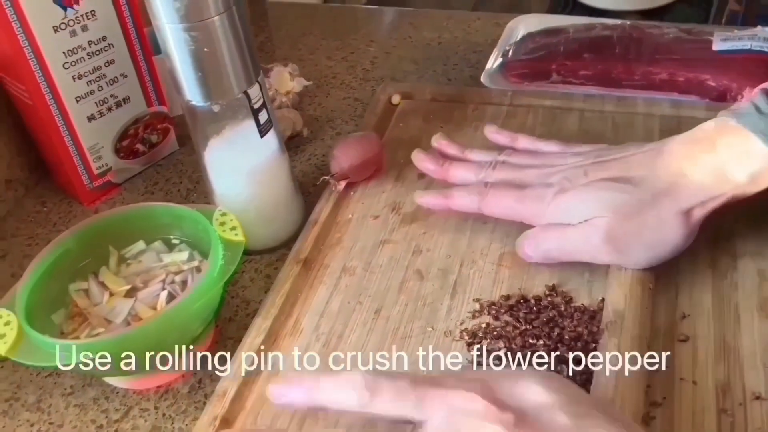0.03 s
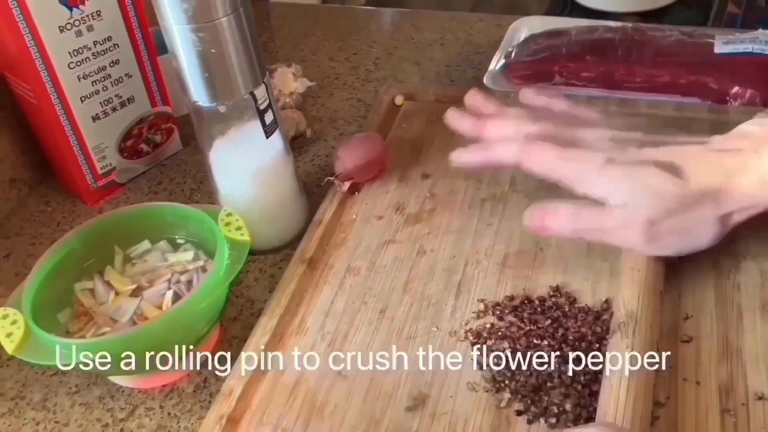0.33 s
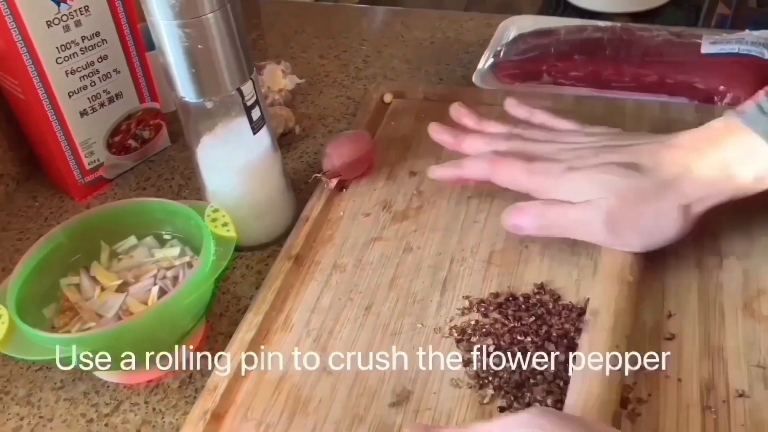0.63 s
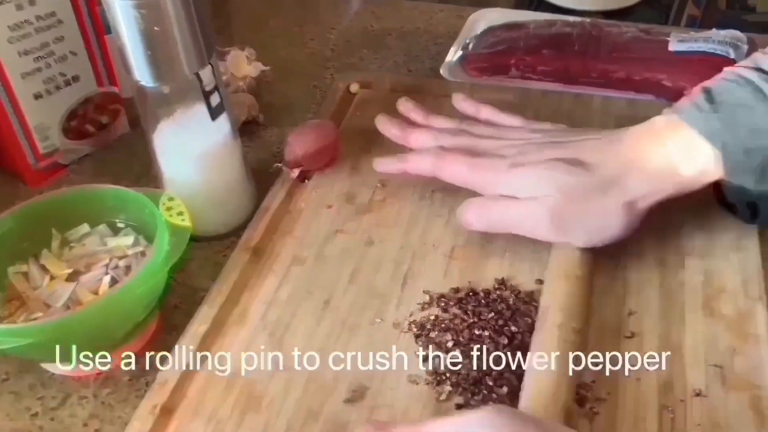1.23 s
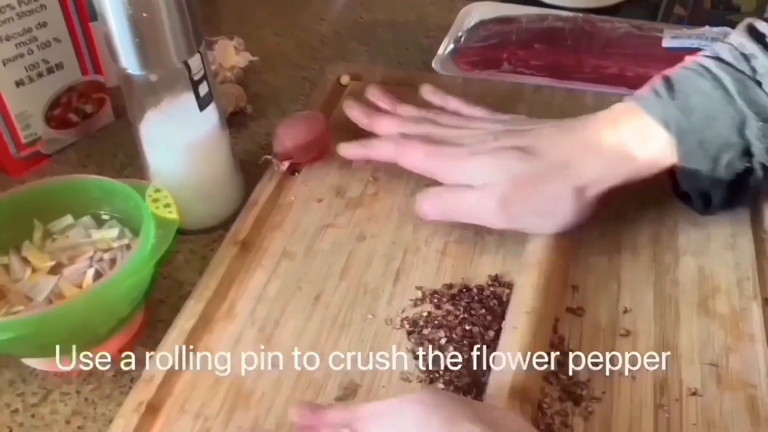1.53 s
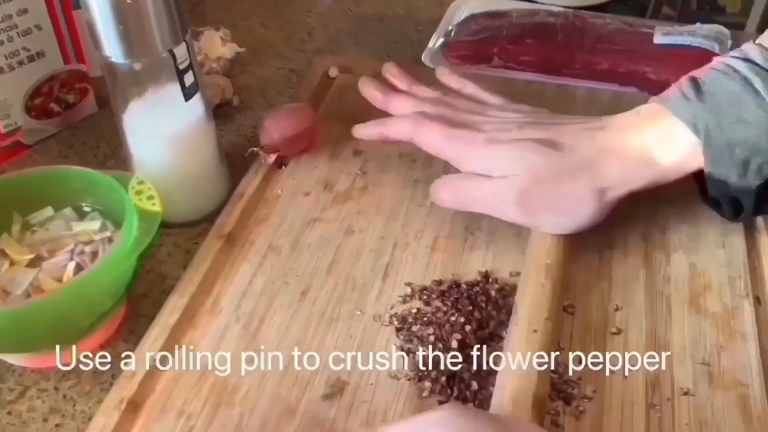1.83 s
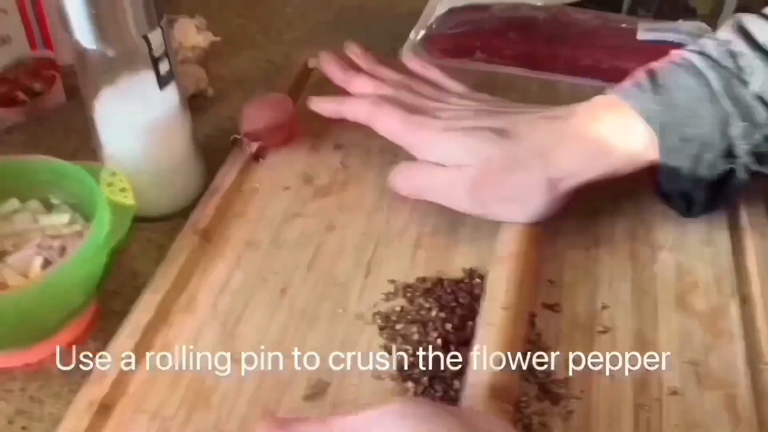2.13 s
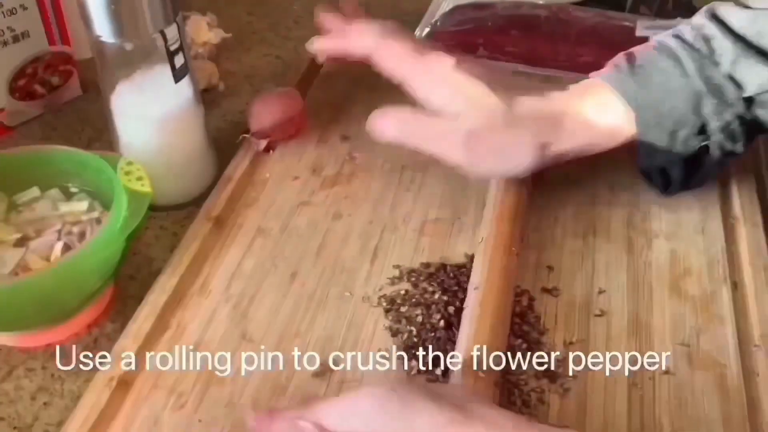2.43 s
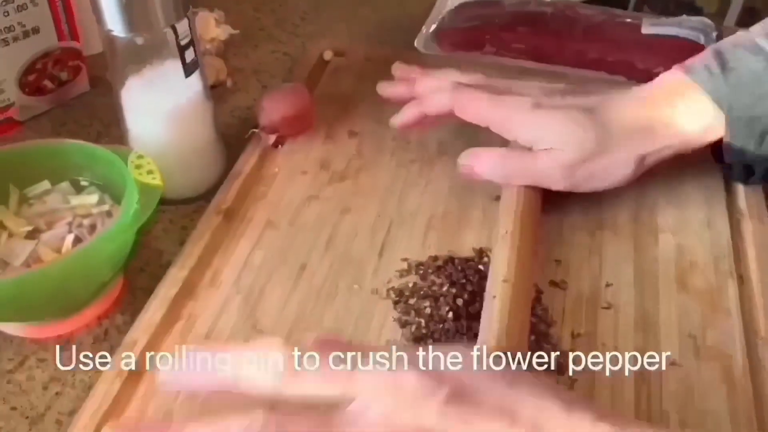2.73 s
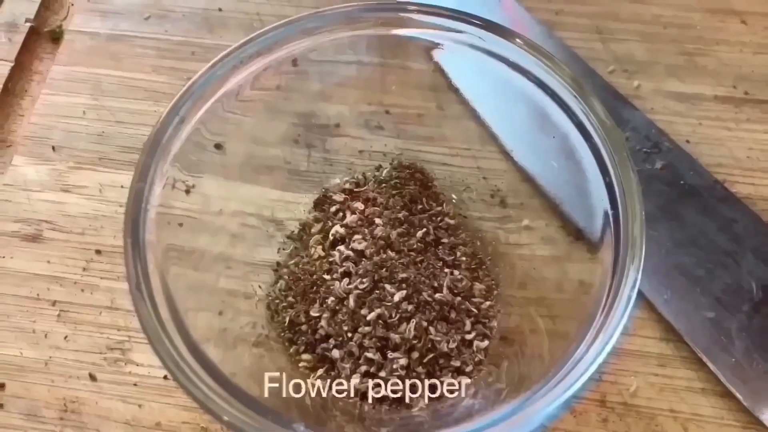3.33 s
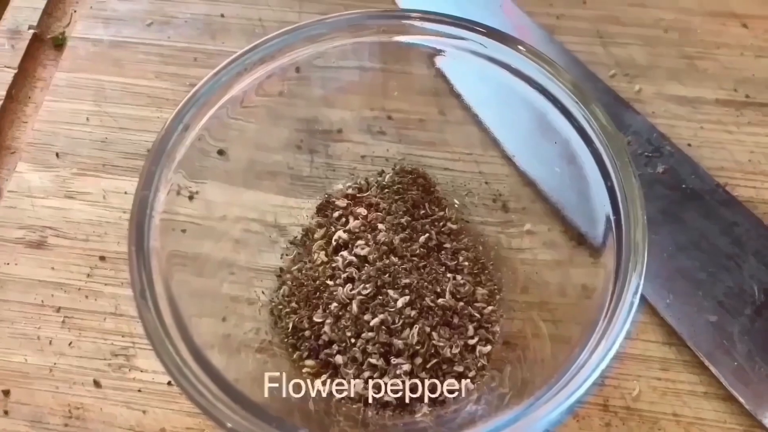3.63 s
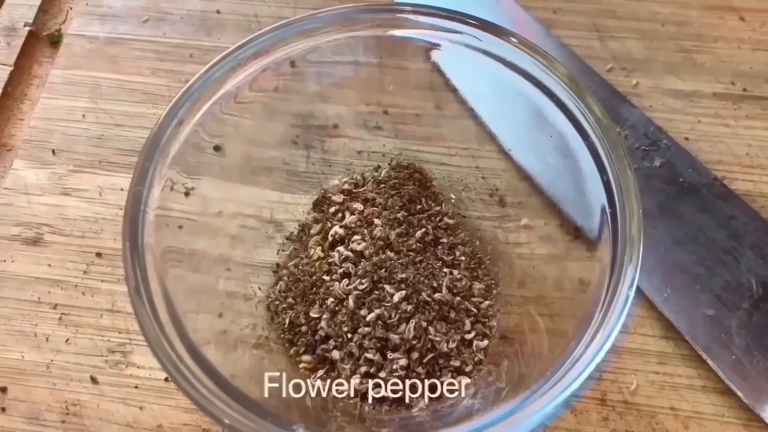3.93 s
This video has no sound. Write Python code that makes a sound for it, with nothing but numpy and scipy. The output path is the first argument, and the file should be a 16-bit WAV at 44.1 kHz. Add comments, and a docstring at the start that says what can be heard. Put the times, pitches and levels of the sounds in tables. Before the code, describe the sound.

Peppercorns crackle in short, crisp bursts under a rolling pin, with soft thuds from the wooden board. After a knock, the crushing cuts off, leaving a low hum and slight rustling in a quiet kitchen.

```python
"""A quiet kitchen: a wooden rolling pin is pressed slowly over dry peppercorns on a wooden board.
Husks snap one by one, each a click ringing shell and wood, and crumble in short crunches of tiny
fractures. The board rings, rumbles, thuds and knocks under the pin. The level dips briefly near 2 s;
at 2.3 s the sound breaks off and returns with only the kitchen's air and hum and a few faint rustles."""
import sys
import numpy as np
from scipy import signal
from scipy.fft import rfft, irfft
from scipy.io import wavfile
from scipy.ndimage import uniform_filter1d

SR = 44100
rng = np.random.default_rng(int(sys.argv[2]) if len(sys.argv) > 2 else 0)


def to_wav(sig):
    """Store sig (one row per channel, or 1-D mono) as 16-bit WAV at the path in sys.argv[1].

    Samples outside -1..1 are clipped; the rate is SR.
    """
    pcm = np.clip(np.atleast_2d(sig), -1, 1) * 32767
    pcm = np.round(pcm).astype(np.int16)
    wavfile.write(sys.argv[1], SR, pcm.T)  # frames by channels


N = 176400
T = np.arange(N) / SR

# Damped resonances of pin and board. Each row: pitch in Hz, width in Hz, gain in dB, pan (L-R) in dB.
WOOD_MODES = [(435, 220, -15, -2), (1230, 240, -5, 4), (1650, 580, 0, 8), (2480, 250, 1, 7.5),
              (3870, 770, -4.5, -4.5)]
# Brief dips in level. Each row: start in seconds, end in seconds, gain in dB.
DIPS = [(1.986, 2.004, -22), (2.311, 2.327, -22), (2.333, 2.376, -45)]


def from_db(db):
    """Decibels to gain."""
    return np.exp(np.asarray(db) * (np.log(10) / 20))


def unit_rms(x):
    """Scale to rms 1."""
    return x / np.sqrt(np.mean(x ** 2) + 1e-20)


def pan(db):
    """Stereo gains for a left minus right level."""
    return from_db([[db / 2], [-db / 2]])


def curve(rows):
    """Join (seconds, value) rows by straight lines."""
    return np.interp(T, *np.transpose(rows))


def at_hz(rows, hz):
    """Read (Hz, value) rows on a log-frequency axis."""
    row_hz, value = np.transpose(rows)
    return np.interp(np.log(hz + 1e-3), np.log(row_hz), value)


def drift(rate_hz):
    """Slow random wander of rms 1."""
    r = np.exp(-80 * np.pi * rate_hz / SR)
    slow = signal.lfilter([1], [1, -2 * r, r * r], rng.standard_normal(N // 40 + 2002))[2000:]
    return np.interp(np.arange(N) / 40, np.arange(len(slow)), unit_rms(slow))


def butterworth(x, order, hz, kind):
    """Low, high or band pass."""
    return signal.sosfilt(signal.butter(order, hz, kind, fs=SR, output="sos"), x)


def resonate(x, hz, width_hz):
    """Two-pole resonance, peak gain 1."""
    r = np.exp(-np.pi * width_hz / SR)
    feedback = [1, -2 * r * np.cos(2 * np.pi * hz / SR), r * r]
    return signal.lfilter(np.array([1, 0, -1]) * (1 - r * r) / 2, feedback, x + 1e-18 * T[:x.shape[-1]])


def noise(colour):
    """Stereo noise of rms 1 from (Hz, dB) rows, alike in both ears in the bass."""
    # Each row: frequency in Hz, left-right correlation.
    likeness = [(60, .95), (150, .91), (300, .8), (600, .45), (2000, .25)]
    hz = np.arange(N // 2 + 1) * SR / N
    mid, side = rfft(rng.standard_normal((2, N)))
    alike = at_hz(likeness, hz)
    spectrum = np.sqrt(1 + alike) * mid + np.sqrt(1 - alike) * side * [[1], [-1]]
    return unit_rms(irfft(from_db(at_hz(colour, hz)) * spectrum, N))


def ring(force, modes):
    """Long-ringing modes driven by a force."""
    return sum(from_db(db) * resonate(force, hz, np.log(1000) / np.pi / t60_s) for hz, db, t60_s in modes)


def band_bank(clicks, bands, pitch_ratio, spread_db=2.7, redraw_hz=45):
    """Parallel panned bands, each driven with a randomly stepping strength."""
    hold, n = SR // redraw_hz, clicks.shape[-1]
    strengths = from_db(spread_db * rng.uniform(-1, 1, (len(bands), n // hold + 1)))
    out = 0
    for strength, (hz, width_hz, db, pan_db) in zip(strengths, bands):
        drive = clicks * np.repeat(strength, hold)[:n]
        out = out + from_db(db) * pan(pan_db) * resonate(drive, hz * pitch_ratio, width_hz)
    return out


def reflections(x, t60_s):
    """Dense decaying echoes of unit energy, unrelated in the two ears."""
    t = T[:int(t60_s * SR) + 2]
    tail = rng.standard_normal((2, len(t))) * from_db(-60 * t / t60_s) * (1 - np.exp(-t * 40 / t60_s))
    tail /= np.sqrt(np.sum(tail ** 2, axis=1, keepdims=True))
    return signal.oaconvolve(x, tail, axes=1)[:, :x.shape[1]]


def worktop(x):
    """Add quick scatter off board and worktop."""
    return x + reflections(x, t60_s=.025)


def kitchen(x, wall_hz=5920, tail_db=-10.5):
    """Add the duller tail of the room."""
    return x + from_db(tail_db) * reflections(butterworth(x, 1, wall_hz, "low"), t60_s=.23)


def room_tone(air_db=-59, hum_gain_db=3, waver_db=1.2):
    """Moving air and the wavering hum of an appliance."""
    # Each row: frequency in Hz, level in dB.
    hum_partials = [(59, -71.5), (176.5, -65.5)]
    # Each row: frequency in Hz, relative level in dB.
    air_colour = [(20, -34), (35, -17), (55, 0.09), (90, -7), (140, -4), (250, -11), (380, -8), (480, -12),
                  (800, -18), (1050, -24), (1220, -21), (1450, -32), (2300, -32), (2900, -39), (4400, -39),
                  (5600, -47), (9000, -45), (16000, -56)]
    # Narrow resonances in the air noise. Each row: centre in Hz, width in Hz, rms in dB.
    air_bands = [(342, 75, -65), (1230, 70, -76.5), (2390, 90, -86)]
    out = 0
    for hz, db in hum_partials:
        rms = from_db(db + hum_gain_db + waver_db * drift(2.7))
        out = out + np.sqrt(2) * rms * np.sin(2 * np.pi * hz * T + .5 * drift(1.8))
    air = noise(air_colour)
    for hz, width_hz, db in air_bands:
        band = resonate(resonate(air, hz, width_hz), hz, 2 * width_hz)
        out = out + from_db(db) * unit_rms(band)
    return out + from_db(air_db) * noise(air_colour)


def rolling(rub_db=-58):
    """The pin rolls on the board: swelling rumble, steady rub of wood on wood."""
    # Each row: time in seconds, level in dB.
    rumble_levels = [(0.0, -81), (0.18, -50.5), (0.27, -76), (0.88, -57.5), (1.05, -53), (1.34, -82),
                     (1.45, -46), (1.52, -56), (2.0, -79), (2.08, -52), (2.3, -53.5)]
    # Each row: frequency in Hz, relative level in dB.
    rumble_colour = [(20, -24), (55, 0), (90, -2.5), (150, -13), (300, -13), (600, -29), (1500, -47),
                     (16000, -92.5)]
    rub_colour = [(20, -24), (120, -5), (300, 0.5), (600, -3.5), (1200, -6), (3000, -22), (16000, -60)]
    return from_db(curve(rumble_levels)) * noise(rumble_colour) + from_db(rub_db) * noise(rub_colour)


def crumbs(grains_per_s=2000, spread_db=3.3, clump_db=2, attack_s=.005, release_s=.011):
    """Force of tiny clumped fractures: steady grinding, swelling as clusters of husks crumble."""
    # Each row: time in seconds, level in dB.
    grinding = [(0, -46), (.25, -49.5), (.47, -57), (.82, -57.5), (1.0, -50), (1.28, -51.5), (1.5, -48),
                (1.78, -59), (2.0, -60), (2.31, -58)]
    # Each row: start in seconds, length in seconds, level in dB.
    crunches = [(0.0, 0.033, -40.5), (0.101, 0.064, -38), (0.163, 0.048, -38), (0.312, 0.1, -46),
                (0.381, 0.028, -47), (0.493, 0.023, -46), (0.522, 0.059, -42), (0.644, 0.091, -47.5),
                (0.737, 0.018, -41.5), (0.835, 0.12, -48.5), (0.934, 0.1, -41), (1.045, 0.034, -35),
                (1.177, 0.053, -50.5), (1.338, 0.088, -39), (1.428, 0.032, -43.5), (1.539, 0.076, -46),
                (1.679, 0.066, -49.5), (1.828, 0.072, -55), (2.077, 0.059, -52), (2.288, 0.044, -52)]
    power = from_db(curve(grinding)) ** 2
    for start_s, length_s, db in crunches:
        rise = np.clip((T - start_s) / attack_s, 0, 1)
        fall = np.exp(-np.clip((T - start_s - length_s) / release_s, 0, 20))
        power += (from_db(db) * rise * fall) ** 2
    sizes = from_db(spread_db * np.minimum(rng.exponential(1, N), 4)) * rng.choice([-1, 1], N)
    breaks = rng.random(N) < grains_per_s / SR
    clumps = from_db(clump_db * np.clip(drift(70), -2, 2))
    return unit_rms(breaks * sizes * clumps) * np.sqrt(power)


def crack_at(force, place, treble_db, spread_oct=.12, spread_db=3, lag_samples=5):
    """Cracks sound through the wood, with a bright treble snap; place along the pin is -1 to 1."""
    # Each row: centre in Hz, width in Hz, gain in dB, pan (L-R) in dB.
    treble_bands = [(6160, 2400, -12.5, -9), (7130, 470, -17.5, 0), (11400, 3000, -12.5, -2.5),
                    (15530, 2600, -12.5, 1)]
    octaves = spread_oct * place
    wood = butterworth(band_bank(force, WOOD_MODES, 2 ** octaves), 2, 180, "high")
    left, right = band_bank(from_db(treble_db) * force, treble_bands, 2 ** (.22 * octaves))
    late_left = np.pad(left, (lag_samples, 0))[:len(right)]
    return pan(spread_db * place) * (wood + [late_left, right])


def snaps(gain_db=6.5, treble_gain_db=17, scatter_db=-5, shell_db=3.5):
    """Each husk gives way in a click and splinters, ringing shell and wood. Returns sound and force."""
    # Each row: time in seconds, level in dB, shell pitch in Hz, relative treble in dB.
    husks = [(0.0355, -20.5, 2480, -18.5), (0.0951, -3.5, 2480, -12), (0.1092, -11, 1680, -23.5),
             (0.1473, -17, 2400, -14), (0.3354, -20, 1800, -25), (0.394, -18, 2200, -15.5),
             (0.4266, -17.5, 1680, -28), (0.4923, -26, 2400, -20), (0.5261, -22.5, 1680, -22),
             (0.5425, -26, 1250, -4), (0.6385, -28.5, 4270, -22), (0.6569, -18.5, 2320, -32),
             (0.6742, -24.5, 1270, -15), (0.7434, -20.5, 2270, -12), (0.7464, -17, 2660, -14.5),
             (0.7919, -21.5, 1250, -20), (0.8723, -16, 2500, -26), (0.9133, -8.5, 2480, -15),
             (0.9383, -20.5, 1770, -28), (0.99, -21, 1770, -27), (1.0447, -17, 2500, -31),
             (1.0802, -17, 2580, -36), (1.1862, -27.5, 2540, -35), (1.2205, -25.5, 1670, -38),
             (1.2668, -28, 2290, -31), (1.3501, -21.5, 2470, -28), (1.37, -23, 2590, -21),
             (1.4014, -23.5, 1240, -15), (1.4144, -19.5, 4160, -7.5), (1.4405, -25.5, 1260, -8.5),
             (1.5402, -27.5, 1650, -11), (1.564, -28, 1230, -33), (1.7442, -24, 2550, -18),
             (1.8001, -29, 1720, -10.5), (1.8333, -35, 2330, -6.5), (1.8485, -28.5, 2270, -26),
             (2.0946, -25, 1470, -48)]
    splinters, splinter_db, splinter_s = 6, -5.5, .0007
    give_way_s, size = .0005, 4096
    wood_pan = [(hz, pan_db) for hz, _, _, pan_db in WOOD_MODES]
    out, board_force = np.zeros((2, N)), np.zeros(N)
    for time_s, db, hz, treble_db in husks:
        force = np.zeros(size)
        force[0] = 1
        delays = (SR * splinter_s * rng.gamma(2, 1, splinters)).astype(int)
        np.add.at(force, delays, from_db(splinter_db) * rng.uniform(-1, 1, splinters))
        force *= from_db(db + gain_db)
        crack = force + from_db(scatter_db) * reflections(force[None], t60_s=.023)
        shell = from_db(shell_db) * pan(at_hz(wood_pan, hz)) * resonate(crack, hz, width_hz=260)
        at = int(SR * (time_s + give_way_s))
        out[:, at:at + size] += shell + crack_at(crack, rng.uniform(-.5, .5), treble_db + treble_gain_db)
        board_force[at:at + size] += force
    return out, board_force


def peppercorns(length_s=2.4, gain_db=6, board_pan_db=6, places=5):
    """Husks snap under the middle of the pin, crumbs break all along it; both ring the board."""
    # Each row: pitch in Hz, gain in dB, T60 in seconds.
    board_modes = [(697, -2.5, .1), (1007, 5, .15), (1154, 3.5, .16), (1260, 5, 0.11), (1506, -1.5, 0.18),
                   (1705, -2.5, 0.061), (1820, -8, 0.32), (2234, 3, 0.037), (2470, -3.5, 0.16),
                   (3660, -6.5, 0.14), (3960, -7, .12)]
    n = int(length_s * SR)
    cracks, snap_force = snaps()
    grains = crumbs()[:n]
    out = cracks[:, :n] + pan(board_pan_db) * ring(snap_force[:n] + grains, board_modes)
    grain_place = rng.integers(0, places, n)
    for k, place in enumerate(np.linspace(-1, 1, places)):
        out += worktop(crack_at(grains * (grain_place == k), place, treble_db=2))
    return from_db(gain_db) * np.pad(out, ((0, 0), (0, N - n)))


def thuds(attack_s=.01):
    """Dull thuds under the pin: sines that fall in pitch as they fade."""
    # Each row: start in seconds, level in dB, first and last pitch in Hz, fall and decay in seconds.
    bumps = [(.1, -40, 150, 61, 0.019, 0.039), (.915, -42, 119, 70, 0.028, .035),
             (1.075, -39.5, 101, 55, 0.017, 0.037), (1.437, -37, 135, 50, 0.016, 0.038),
             (1.928, -38, 86, 50.3, 0.016, 0.031), (2.199, -33.5, 633, 77.5, 0.0073, 0.021)]
    out = 0
    for start_s, db, first_hz, last_hz, fall_s, decay_s in bumps:
        t = np.clip(T - start_s, 0, 1)
        hz = last_hz + (first_hz - last_hz) * np.exp(-t / fall_s)
        envelope = (1 - np.exp(-t / attack_s)) * np.exp(-t / decay_s)
        out = out + from_db(db) * envelope * np.sin(2 * np.pi * np.cumsum(hz * (t > 0)) / SR)
    return out


def knocks(click_feed_db=26, tock_feed_db=-10, pan_db=3.5):
    """The pin knocks on the board: a few swelling cycles, then the pin's short ring."""
    # Each row: start in seconds, level in dB, pitch in Hz, width in Hz.
    hits = [(1.9093, -33, 1250, 700), (1.9125, -38.5, 470, 300), (2.099, -15.5, 1460, 363)]
    # Each row: pitch in Hz, gain in dB, T60 in seconds.
    pin_modes = [(708, 5, 0.069), (817, 2, 0.074), (1177, -1, 0.11), (1530, -17, 0.063), (1680, -17, 0.13),
                 (2120, -17, 0.14)]
    out = 0
    for start_s, db, hz, width_hz in hits:
        click = signal.unit_impulse(N, int(start_s * SR))
        tock = resonate(resonate(click, hz, width_hz), hz, 2 * width_hz)
        tock /= np.abs(tock).max()
        drive = from_db(tock_feed_db) * tock + from_db(click_feed_db) * click
        out = out + from_db(db) * (tock + ring(drive, pin_modes))
    return pan(pan_db) * out


def rustles():
    """Faint brushing: brief swells of noise, each in its own band."""
    # Each row: peak time in seconds, level in dB, attack and decay in seconds, low and high edge in Hz.
    swells = [(2.595, -59.5, 0.045, 0.027, 2600, 11880), (2.76, -50.5, 0.007, 0.039, 260, 13200),
              (3.29, -63, .1, 0.04, 2200, 5000), (3.5, -58.5, 0.018, 0.044, 2540, 4240),
              (3.87, -45.5, 0.005, 0.037, 5440, 16090)]
    # Each row: frequency in Hz, relative level in dB.
    colour = [(20, -49), (200, -5), (370, 18), (550, 9), (800, 11.5), (1200, 2), (1800, 8), (2900, -6.5),
              (4000, -6), (5800, -19), (9000, -8), (12000, -25), (15500, -16)]
    out, hiss = 0, noise(colour)
    for peak_s, db, attack_s, decay_s, low_hz, high_hz in swells:
        fade = np.maximum((peak_s - T) / attack_s, (T - peak_s) / decay_s)
        envelope = np.exp(-np.minimum(fade, 20))
        out = out + from_db(db) * envelope * butterworth(hiss, 2, [low_hz, high_hz], "band")
    return out


def scene():
    """Crushing stops at the last dip; the kitchen hums throughout."""
    crushing = kitchen(peppercorns() + worktop(knocks())) + thuds() + rolling()
    stop_s = DIPS[-1][0]
    return crushing * (T < stop_s) + rustles() + room_tone()


def record(dry, peak_limit=.8, cutoff_hz=17000):
    """The level dips briefly, peaks are rounded, the top treble is cut."""
    gain_db = sum(db * ((T > start_s) & (T < end_s)) for start_s, end_s, db in DIPS)
    gain = uniform_filter1d(from_db(gain_db), size=88)
    rounded = peak_limit * np.tanh(dry * gain / peak_limit)
    return signal.sosfilt(signal.cheby2(14, 70, cutoff_hz, fs=SR, output="sos"), rounded)


dry = scene()
out = record(dry)
to_wav(out)
```